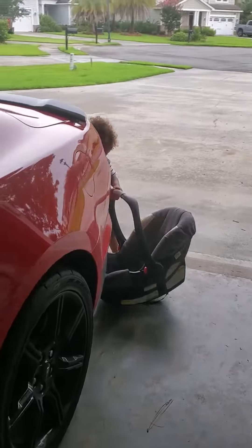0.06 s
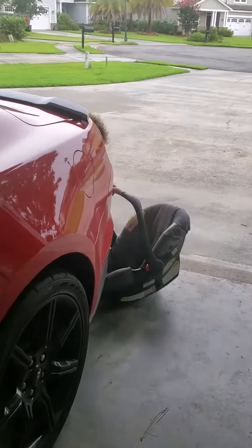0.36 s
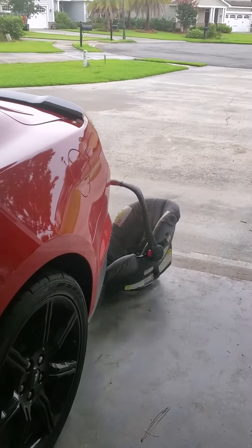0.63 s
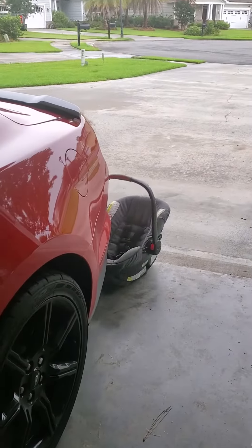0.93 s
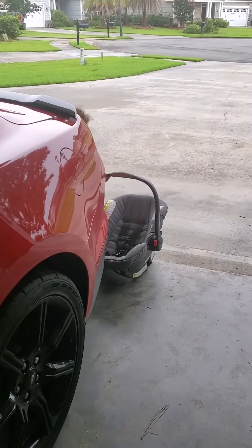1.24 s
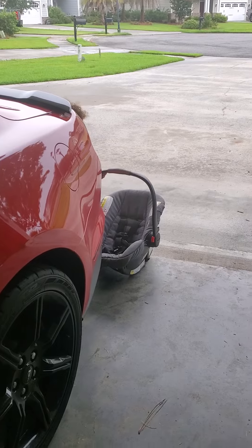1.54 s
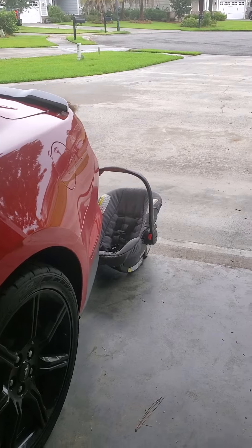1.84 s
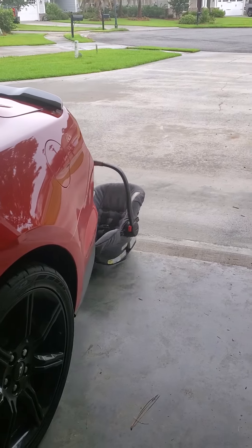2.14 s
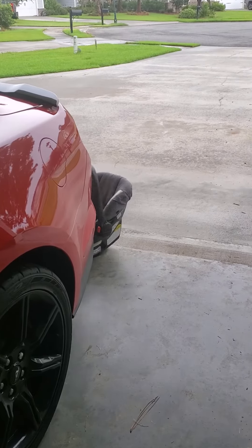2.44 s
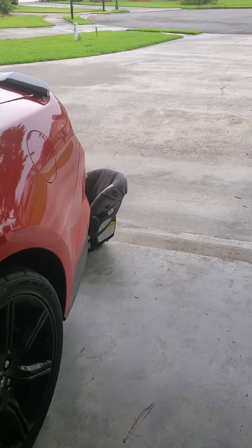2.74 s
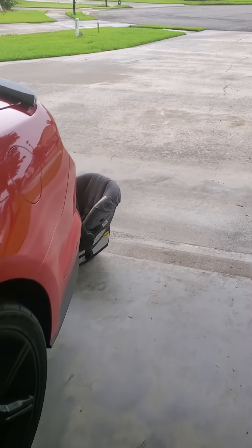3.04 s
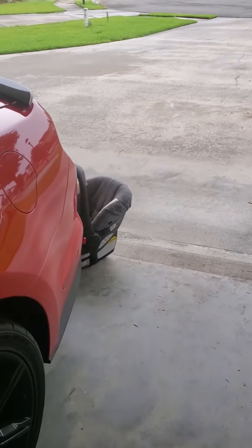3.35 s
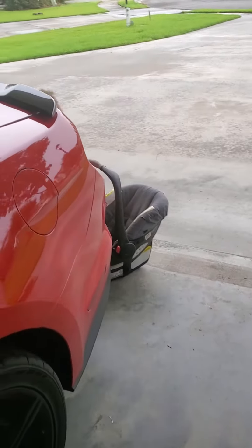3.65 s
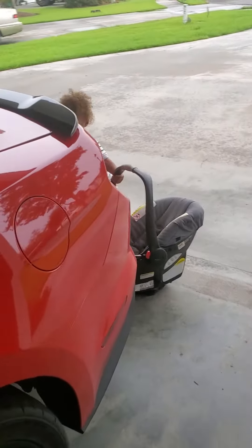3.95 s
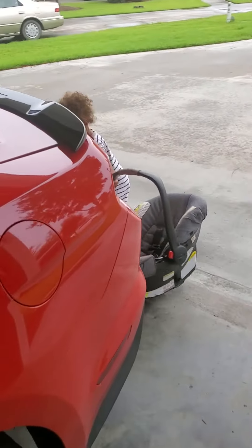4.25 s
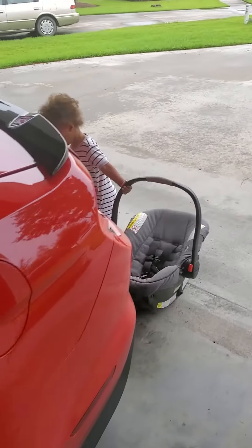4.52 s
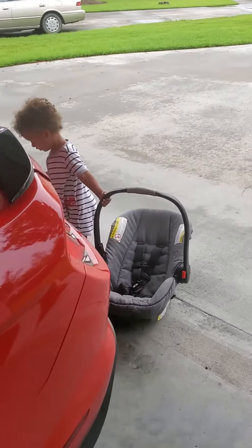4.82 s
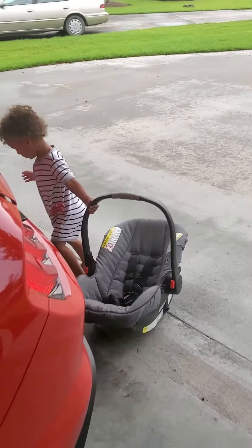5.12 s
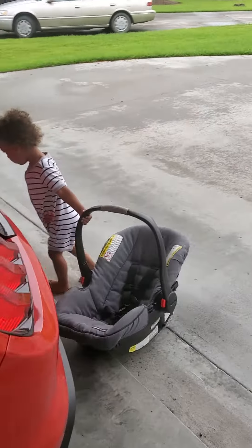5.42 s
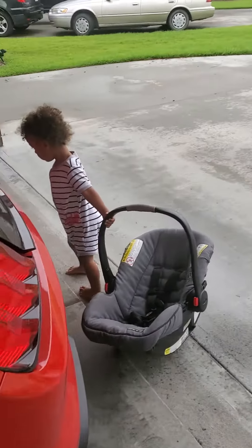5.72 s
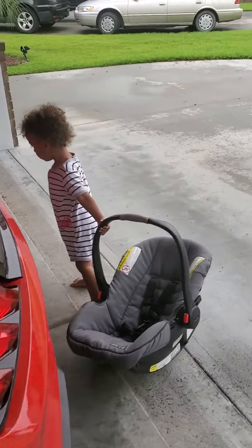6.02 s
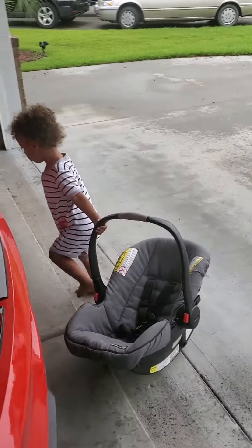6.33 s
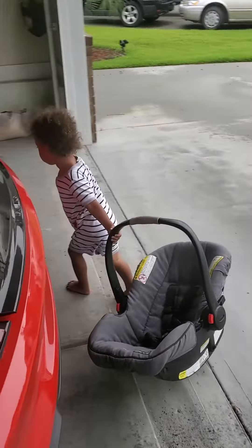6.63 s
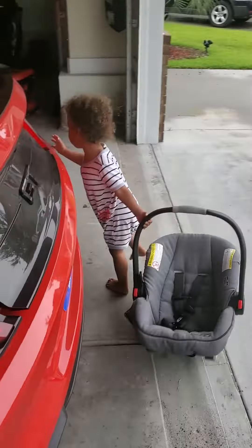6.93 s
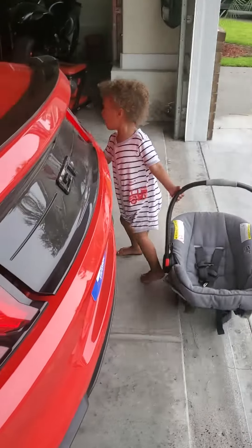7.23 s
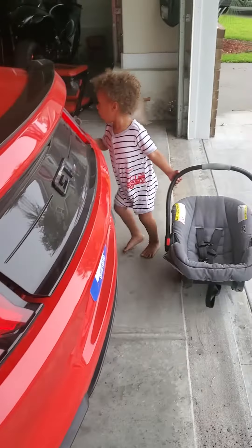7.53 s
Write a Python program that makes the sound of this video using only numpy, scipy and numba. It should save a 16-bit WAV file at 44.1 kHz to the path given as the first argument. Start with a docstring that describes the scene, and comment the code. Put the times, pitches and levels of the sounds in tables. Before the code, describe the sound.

At the mouth of a garage, a plastic infant car seat is dragged over gritty concrete in short uneven pulls. It rasps, hisses and briefly squawks, pauses with a few dull bumps, then lands with a hollow knock. After lighter scrapes and another sharp knock, the dragging grows more continuous, with rumbling and clattering. The garage adds a short echo, and a nearby phone microphone catches faint outdoor rumble and insects.

```python
"""At the mouth of a garage, a toddler drags a plastic infant seat over concrete in short uneven pulls.
Stick-slip friction on grit makes the base rasp, hiss and squeak; impacts at the floor joints excite
the damped modes of the hollow shell, which rumbles and knocks. The garage reverberates briefly.
Dull bumps sound close by; outdoor rumble and faint insects lie behind. A phone's two ports hear it."""
import sys
import numpy as np
from scipy import signal
from scipy.fft import rfft, irfft, next_fast_len
from scipy.io import wavfile
from scipy.ndimage import uniform_filter1d
from numba import njit

SR = 44100
rng = np.random.default_rng(int(sys.argv[2]) if len(sys.argv) > 2 else 0)


def to_wav(sig):
    """Store sig (one row per channel, or 1-D mono) as 16-bit WAV at the path in sys.argv[1].

    Samples outside -1..1 are clipped; the rate is SR.
    """
    pcm = np.clip(np.atleast_2d(sig), -1, 1) * 32767
    pcm = np.round(pcm).astype(np.int16)
    wavfile.write(sys.argv[1], SR, pcm.T)  # frames by channels


N = 342657
TIME = np.arange(N) / SR
PORT_SPACING_M, SOUND_SPEED_M_S = .145, 343

# Levels are relative within each layer.
# pulls: t/s, rise/s, length/s, rasp/dB, rumble/dB, hiss/dB, squawk f/Hz, squawk/dB
SEAT_PULLS = [ (.1, 0.068, 0.18, -43.5, -50, -45.5, 3200, -76),
              (.256, 0.013, 0.059, -28.5, -32, -28, 3220, -28.5),
              (.61, 0.038, 0.12, -28, -35, -35, 1530, -30),
              (.765, 0.0098, 0.066, -34.5, -43, -38.5, 1370, -30.5),
              (.88, .02, 0.19, -50.5, -50, -54, 1300, -56), (1.1, 0.023, 0.11, -76, -34.5, -73, 1320, -76),
              (2.04, 0.049, 0.069, -35.5, -45, -40.5, 2140, -34.5),
              (2.15, 0.1, 0.11, -41, -50, -37, 2140, -42), (2.52, 0.016, 0.028, -33, -32, -45, 1600, -34),
              (2.79, 0.041, 0.055, -40, -47.5, -39.5, 1640, -35),
              (2.86, 0.0137, 0.092, -40, -60.5, -40, 3700, -38),
              (3.05, 0.011, 0.077, -45.5, -51, -42, 3000, -48),
              (3.6, 0.044, 0.078, -44, -42, -48.5, 2100, -55),
              (3.89, 0.048, 0.067, -53, -52, -46.5, 2000, -66),
              (4.03, 0.051, 0.35, -54, -36.5, -52.5, 1400, -41.5),
              (4.22, 0.0049, 0.062, -36, -27.5, -39, 1400, -29.5),
              (4.31, 0.0036, 0.028, -31, -34, -36.5, 1400, -36),
              (4.51, 0.007, 0.2, -42, -26.5, -43, 1700, -47),
              (4.72, 0.022, 0.13, -45.5, -41.5, -55, 1680, -63.5),
              (4.91, 0.0092, 0.17, -60, -54, -50.5, 2280, -54),
              (5.12, 0.038, 0.11, -40.5, -34, -47.5, 2000, -59),
              (5.34, 0.082, 0.22, -54, -33.5, -55, 1770, -50.5),
              (5.48, 0.014, 0.11, -39, -33, -47, 1970, -42.5),
              (5.62, 0.057, 0.046, -60, -41, -26.5, 2440, -30.5),
              (5.89, 0.049, 0.16, -34.5, -26, -42.5, 1870, -48),
              (6.125, 0.0033, 0.014, -38, -25.5, -44, 2000, -47),
              (6.35, 0.032, 0.0637, -52, -31, -35.5, 2463, -30),
              (6.62, 0.0092, 0.062, -36, -27, -44, 2140, -34.5),
              (6.71, 0.023, 0.075, -38, -27.5, -39.5, 2520, -46.5),
              (6.775, .006, 0.077, -40, -31.5, -43, 2580, -51),
              (6.885, 0.0042, 0.2, -34, -22.5, -38, 1460, -52),
              (7.08, 0.036, 0.23, -35, -26.5, -38, 1820, -49),
              (7.33, 0.058, 0.26, -45, -27.5, -49, 2130, -50),
              (7.58, 0.15, 0.24, -48, -39.5, -49.5, 2160, -49.5), ]
# slow sliding between pulls: start t/s, end t/s, level/dB
SEAT_CREEPS = [(0, 0.69, 0.5), (1.95, 2.48, 0.5), (3.1, 3.48, -11.5), (3.3, 3, -31), (3.56, 3.89, -6),
               (3.88, 8.5, -2)]
# drops of the shell on the floor: t/s, blow/dB, favoured f/Hz, crack/dB, rattle time constant/s
IMPACTS = [(2.253, -0.5, 230, -14.5, 0.01), (2.272, -27, 199, -18, 0.0065), (2.526, -17, 298, -39, 0.0058),
           (2.549, -25, 380, -33, 0.0085), (2.687, -10, 267, -31.5, 0.048), (2.835, -25, 432, -32.5, 0.012),
           (4.448, -3.5, 250.7, -7.5, 0.0072), (4.452, 0, 248, -5.5, 0.0042),
           (4.466, -5.5, 332, -20.5, 0.0067), (4.491, -12.5, 258, -20.5, 0.0023),
           (4.542, -18, 420, -24, 0.0091), (4.589, -16, 510, -29, 0.0091), (5.279, -20, 313, -37, 0.015),
           (5.951, -29, 280, -29, 0.018), (6.036, -8, 290, -20.5, 0.0051), (6.676, -11, 270, -26.5, 0.0096),
           (6.741, -13, 290, -41, .015), (6.883, -4, 300, -14.5, 0.0063), (6.961, -16, 330, -21, 0.018),
           (7.002, -12.5, 310, -27.5, 0.012), (7.107, -6.5, 300, -21.5, 0.0065),
           (7.319, -11, 324, -26.5, 0.013), (7.5, -21, 260, -49, 0.018), (7.723, -24, 286, -44, 0.0127)]
# an edge crushes or skids over grit: t/s, level/dB, length/s, centre f/Hz
GRIT_SKIDS = [(0.256, -24.5, 0.045, 7100), (0.777, -32, 0.021, 3140), (2.072, -41, 0.024, 2500),
              (2.159, -35, 0.0081, 3960), (2.275, -26.5, 0.0052, 2980), (2.827, -36.5, 0.0073, 9300),
              (4.225, -38, .002, 9000), (4.318, -35, 0.008, 8000), (4.443, -40, 0.0018, 7000),
              (4.539, -41, 0.0064, 9000), (4.613, -36, 0.0035, 10000), (4.908, -38.5, 0.015, 3000),
              (5.014, -43, 0.004, 9300), (5.494, -40.5, 0.0078, 2200), (5.547, -36, 0.0018, 5000),
              (5.609, -26, 0.0029, 3930), (5.649, -36, 0.02, 4400), (5.929, -36.5, 0.0036, 5030),
              (6.323, -41, 0.0077, 9800), (6.374, -45, 0.018, 2900), (6.767, -28.5, 0.0058, 3400),
              (6.894, -29, 0.003, 8200), (6.953, -28.5, 0.0028, 9000), (6.971, -22.5, 0.0202, 9200),
              (7.43, -38, 0.0094, 2640)]
# squeaks of a plastic edge: t/s, length/s, start f/Hz, end f/Hz, level/dB
SQUEAKS = [(6.636, .018, 2380, 2000, -44), (6.774, 0.00853, 2710, 3840, -33),
           (6.974, 0.0063, 4180, 9000, -31)]
# dull bumps: t/s, level/dB, f/Hz
SOFT_BUMPS = [(1.03, -23.5, 85.2), (1.085, -24, 103), (1.131, -11, 100), (1.178, -20.5, 147.6),
              (1.462, -22, 96.5), (1.628, -21, 94.5), (1.852, -19.5, 79.6), (2.243, -17, 99),
              (3.026, -26, 117), (4.447, -16.5, 112.3)]
# modes of the hollow shell: f/Hz, level/dB, T60/s
SHELL_MODES = [(158, -28.5, 0.11), (201, -10, 0.13), (241, 2, 0.0323), (280, -14, 0.079), (322, 3, 0.037),
               (377.5, 2.5, 0.024), (457.4, -4.5, 0.1), (544, -4, 0.032), (673, -3.5, 0.043),
               (793, -6, 0.03), (915, -11.5, 0.046), (1080, -18.5, 0.025)]
# resonances of the ribs of the base: f/Hz, bandwidth/Hz, gain/dB
RIB_RESONANCES = [(730, 187, 2.5), (950, 24, 3), (1400, 210, 0), (3110, 260, 1.5), (3700, 990, 1),
                  (9200, 1800, 3.5)]
# spectra of rasping grit, hissing sand and the crack at the rim: f/Hz, level/dB
RASP_SPECTRUM = [(100, -35), (400, 6), (800, 0), (1400, 0.5), (2200, -2.5), (3500, -4), (4600, -6),
                 (6500, -44), (16000, -60)]
SAND_SPECTRUM = [(500, -46), (2500, -12), (4500, 1), (6000, -0.5), (9000, 0), (11000, 1), (15000, 2),
                 (18000, -32)]
CRACK_SPECTRUM = [(25, -66), (85, -6.5), (160, -8), (300, 8.5), (500, -1.5), (1000, 3.5), (1650, -2),
                  (2700, -10.5), (5000, -17.5), (9000, -26), (16000, -19)]
# spectrum of a skid: f/centre f, level/dB
SKID_SPECTRUM = [(.15, -2.5), (.45, -6), (.75, 0.5), (1.15, 0), (1.9, -8), (6, -14.5)]
# positions of the seat: start t/s, bearing to the left/degrees, direct sound/dB
SEAT_POSITIONS = [(0, 13, -13.5), (.55, 37, -8), (1.9, 6, -12.5), (2.45, 13.5, -12), (3.5, 35.5, -9.5),
                  (4.4, 51, -5.5), (4.851, 55, -7.5), (6.28, 20.5, -11.5), (6.76, -9.5, -7)]
# reverberation time of the garage: f/Hz, T60/s
GARAGE_T60 = [(150, 0.13), (400, 0.54), (1000, 0.53), (2800, 0.53), (7000, 0.48), (15000, 0.31)]
# spectrum of the outdoor rumble: f/Hz, level/dB
OUTDOOR_SPECTRUM = [(20, -57), (30, -12.5), (45, -4), (60, 0.5), (82, 1), (130, -8), (250, -10.5),
                    (400, -19.5), (800, -26.5), (1300, -39), (2500, -57.5), (5000, -58.5), (16000, -66.5)]
# course of the outdoor rumble: t/s, level/dB
OUTDOOR_LEVEL = [(0.0, -46.5), (1.67, -37.5), (1.92, -39.5), (2.27, -37.5), (2.51, -43.5), (4.57, -42),
                 (7.1, -37.5), (7.25, -40.5), (7.77, -33)]
# calls of insects and birds: t/s, length/s, f/Hz, half-width/Hz, level/dB
GARDEN_CALLS = [(1.285, 0.21, 6520, 110, -68), (1.302, 0.3, 2070, 220, -70), (1.628, 0.24, 6520, 110, -69),
                (2.5, 0.14, 6500, 110, -65), (3.542, 0.12, 6520, 110, -70)]
# difference in response between the ports: f/Hz, left minus right/dB
PORT_DIFFERENCE = [(250, 0.5), (1300, 0.5), (2300, -2.5), (4200, 1.3), (8000, 0.5), (12500, 0)]


def runner(gains, squawk_hz):
    """Stick-slip friction: one runner of the base catches on grit, exciting the ribs and the shell."""
    judder = unit(undb(1.125 * walk(per_s=61) + 2 * walk(per_s=25)))
    pebbles = undb(-6.5) * grains(per_s=30, spread_db=0.5)  # lone ticks among the dense grit
    grit = grains(per_s=1600, spread_db=3.5) * judder + pebbles
    rasp = colour(grit, RASP_SPECTRUM, RIB_RESONANCES)
    wavering_hz = squawk_hz * np.exp(0.0884 * walk(per_s=19))
    squawk = unit(resonate(rasp, wavering_hz, damping=0.33))
    shaking = grains(per_s=700, spread_db=0.5) * np.sqrt(judder)
    rumble = unit(ring(shaking, shell_response(favoured_hz=384, focus_db=4)))
    sand = grains(per_s=1300, spread_db=3.5) * judder + pebbles
    hiss = colour(sand, SAND_SPECTRUM, RIB_RESONANCES)
    return undb([-6, -6, -3, -6]) @ (gains * [rasp, rumble, hiss, squawk])


def drag():
    """Friction noise follows the motion: gains of rasp, rumble, hiss and squawk, and the squawk's f/Hz."""
    creep = sum(undb(db) * stroke(start, rise=0.031, length=end - start, sag_db=-0.5)
                for start, end, db in SEAT_CREEPS)
    gains = np.zeros((4, N))
    gains[:3] = np.outer(undb([-49.5, -46, -56]), creep)  # creeping does not squawk
    squawk_hz = np.full(N, float(SEAT_PULLS[0][6]))
    for start, rise, length, rasp_db, rumble_db, hiss_db, hz, squawk_db in SEAT_PULLS:
        here = slice(int(start * SR), int(start * SR) + SR)
        envelope = stroke(start, rise, length, sag_db=2.5)[here]
        pull = np.outer(undb([rasp_db, rumble_db, hiss_db, squawk_db]), envelope)
        gains[:, here] = np.maximum(gains[:, here], pull)
        squawk_hz[here] = hz
    return gains, squawk_hz


def stroke(start, rise, length, sag_db, coast_s=0.023):
    """Envelope of one slide: linear rise, drift in level, exponential decay as the seat coasts."""
    t = TIME - start
    sag = undb(-sag_db * np.clip(t / length, 0, 1))
    return np.clip(t / rise, 0, 1) * sag * np.exp(-np.maximum(t - length, 0) / coast_s)


def shell_response(favoured_hz, focus_db, detune=0.067, tones_per_mode=4):
    """Modal superposition: clusters of damped tones, focus_db weaker per octave from the favoured pitch."""
    t = TIME[:SR // 3]
    modes = SHELL_MODES * tones_per_mode
    out = 0
    for (hz, db, t60), (scatter_db, offset) in zip(modes, rng.standard_normal((len(modes), 2))):
        gain = undb(db + scatter_db - focus_db * abs(np.log2(hz / favoured_hz)))
        tone = np.sin(2 * np.pi * hz * (1 + detune * offset) * t)
        out = out + gain * tone * undb(-60 * t / t60)
    return out


def knocks():
    """Impact excitation: each drop booms in the shell and cracks at the rim, where loose parts chatter."""
    out = np.zeros(N)
    t = TIME[:SR // 3]
    give = 1 - np.exp(-t / 0.000934)  # the plastic yields before it rings
    for start, blow_db, hz, crack_db, rattle_s in IMPACTS:
        boom = shell_response(hz, focus_db=7) * give
        chatter = rng.standard_normal(len(t)) * give * np.exp(-t / rattle_s)
        crack = colour(chatter, CRACK_SPECTRUM, RIB_RESONANCES)
        add(out, start, undb(blow_db) * boom / np.abs(boom).max() + undb(crack_db) * crack)
    return out


def jolts(contact_s=0.0021, gain_db=-9):
    """Forced motion: on landing, the seat's weight drives the whole base through a cycle or two."""
    out = np.zeros(N)
    t = TIME[:SR // 20]
    pulse = t / contact_s * np.exp(1 - t / contact_s)
    for start, blow_db, hz, _, _ in IMPACTS:
        add(out, start, -undb(blow_db + gain_db) * pulse * np.sin(2 * np.pi * hz * t))
    return out


def skids(attack_s=0.00068, release_s=0.0012, catch_db=5, catch_s=0.0025):
    """Brittle fracture: crushed grit gives bright bursts, strongest as the edge breaks loose."""
    out = np.zeros(N)
    grit = grains(per_s=6000, spread_db=4.5)
    t = TIME[:SR // 4]
    catch = np.minimum(t / attack_s, 1) * undb(catch_db * np.exp(-t / catch_s))
    for start, db, length, hz in GRIT_SKIDS:
        release = np.exp(-np.maximum(t - length, 0) / release_s)
        burst = catch * release * grit[int(start * SR):][:len(t)]
        spectrum = [(ratio * hz, level) for ratio, level in SKID_SPECTRUM]
        add(out, start, undb(db) * colour(burst, spectrum, RIB_RESONANCES))
    return out


def squeaks(wobble=.02, octave_db=-15):
    """Stick-slip oscillation of a plastic edge: a brief unsteady glide with its second harmonic."""
    out = np.zeros(N)
    unsteady = 1 + wobble * walk(per_s=400)
    for start, length, from_hz, to_hz, db in SQUEAKS:
        along = np.linspace(0, 1, int(length * SR))
        hz = (from_hz + (to_hz - from_hz) * along) * unsteady[int(start * SR):][:len(along)]
        phase = 2 * np.pi * np.cumsum(hz) / SR
        arch = 2 * np.sqrt(along * (1 - along))
        add(out, start, undb(db) * arch * (np.sin(phase) + undb(octave_db) * np.sin(2 * phase)))
    return out


def bumps():
    """Heavily damped vibration: padded thuds of a few cycles, each with a muffled scuff."""
    out = np.zeros(N)
    t = TIME[:SR // 4]
    swell = t / 0.0248 * np.exp(1 - t / 0.012)
    for start, db, hz in SOFT_BUMPS:
        noise = rng.standard_normal(len(t))
        scuff = colour(noise, [(60, -3), (150, 16.5), (420, 5), (900, -59), (2500, -97.5)])
        add(out, start, undb(db) * swell * (np.sin(2 * np.pi * hz * t) + 0.3 * scuff))
    return out


def garage(sound, facing_db):
    """Room convolution: each position has its own echoes; facing_db weights the direct path alone."""
    position = np.searchsorted(np.array(SEAT_POSITIONS)[1:, 0], TIME)
    out = np.zeros((2, N))
    for k, (_, bearing, direct_db) in enumerate(SEAT_POSITIONS):
        crossfade = uniform_filter1d((position == k) * 1., size=512)
        here = np.flatnonzero(crossfade > 1e-6)
        for port, response in zip(out, garage_response(bearing, direct_db + facing_db)):
            add(port, TIME[here[0]], signal.fftconvolve(sound[here] * crossfade[here], response))
    return out


def garage_response(bearing, direct_db, echoes_db=-6, early_s=0.0099, bands=8):
    """Impulse response: direct sound, early reflections from floor and car, then reverberation."""
    t = TIME[:SR]
    hz, field = diffuse(SR)
    centres = np.geomspace(120, 15000, bands)
    late = 0
    for centre, weights in zip(centres, np.eye(bands)):
        band = irfft(field * on_log_axis(hz, np.c_[centres, weights]))
        late = late + band * undb(-60 * t / on_log_axis(centre, GARAGE_T60))
    late *= 1 - np.exp(-t / 0.0019)
    early = irfft(diffuse(SR)[1]) * np.exp(-t / early_s) * (1 - np.exp(-t / 0.0013))
    response = undb(echoes_db) * (unit(late) + unit(early)) / np.sqrt(SR)
    lag = int(PORT_SPACING_M * np.sin(np.radians(bearing)) / SOUND_SPEED_M_S * SR)
    response[[0, 1], [max(-lag, 0), max(lag, 0)]] += undb(direct_db)  # the far port hears it later
    return response


def outdoors(gust_db=1.5, gain_db=2):
    """Diffuse low-frequency noise of open air and far traffic, modulated by quick gusts."""
    size = next_fast_len(N)
    noise = irfft(diffuse(size)[1], size)[:, :N]
    air = np.array([colour(port, OUTDOOR_SPECTRUM) for port in noise])
    level_db = np.interp(TIME, *np.transpose(OUTDOOR_LEVEL)) + gust_db * walk(per_s=12)
    return unit(air) * undb(level_db + gain_db)


def insects():
    """Narrow-band noise: a faint steady chorus, with short calls of insects and birds over it."""
    out = undb(-73) * buzz(hz=9100, half_width_hz=380, size=N)
    out += undb(-80) * buzz(hz=6560, half_width_hz=130, size=N)
    t = TIME[:SR // 2]
    for start, length, hz, half_width_hz, db in GARDEN_CALLS:
        arch = np.sqrt(np.maximum(1 - (2 * t / length - 1) ** 2, 0))
        for port, call in zip(out, buzz(hz, half_width_hz, len(t))):
            add(port, start, undb(db) * arch * call)
    return out


def buzz(hz, half_width_hz, size):
    """Band-pass filtering of a diffuse field leaves a pitched noise from all sides."""
    padded = next_fast_len(size)
    f, field = diffuse(padded)
    return unit(irfft(field / (1 + ((f - hz) / half_width_hz) ** 4), padded)[:, :size])


def diffuse(size):
    """Diffuse-field coherence: noise spectra at the ports, alike in the bass, unrelated in the treble."""
    hz = np.fft.rfftfreq(size, 1 / SR)
    coherence = np.sinc(2 * hz * PORT_SPACING_M / SOUND_SPEED_M_S)
    mid, side = rfft(rng.standard_normal((2, size)))
    mid, side = mid * np.sqrt((1 + coherence) / 2), side * np.sqrt((1 - coherence) / 2)
    return hz, np.array([mid + side, mid - side])


def grains(per_s, spread_db):
    """Poisson impulses: random sharp catches, a few much larger than the rest; rms 1."""
    hit = rng.random(N) < per_s / SR
    size = undb(spread_db * np.minimum(rng.exponential(size=N), 5))
    return unit(hit * size * rng.standard_normal(N))


def walk(per_s):
    """Random modulation: straight lines between Gaussian values; rms 1."""
    knots = rng.standard_normal(4096)
    return unit(np.interp(TIME * per_s, np.arange(len(knots)), knots))


@njit
def resonate(x, hz, damping):
    """Second-order resonance with a moving centre frequency; damping is 1/Q."""
    y, band, low = np.empty(len(x)), 0., 0.
    for i in range(len(x)):
        g = np.tan(np.pi * hz[i] / SR)
        v = (band + g * (x[i] - low)) / (1 + g * (g + damping))
        band, low, y[i] = 2 * v - band, low + 2 * g * v, damping * v
    return y


def colour(x, spectrum, peaks=(), size=4096):
    """Minimum-phase filter of unit energy: a smooth spectrum with resonance peaks on it."""
    hz = np.fft.rfftfreq(size, 1 / SR)
    peaks_db = sum(db / (1 + (2 * (hz - f) / width) ** 2) for f, width, db in peaks)
    cepstrum = irfft(np.log(undb(on_log_axis(hz, spectrum) + peaks_db)))
    cepstrum[1:size // 2] *= 2  # folding the cepstrum makes the filter causal
    cepstrum[size // 2 + 1:] = 0
    response = irfft(np.exp(rfft(cepstrum)))
    return ring(x, response / np.linalg.norm(response))


def ring(x, response):
    """Convolution with an impulse response."""
    return signal.oaconvolve(x, response)[:len(x)]


def on_log_axis(hz, points):
    """Interpolation of (f/Hz, value) points over log frequency."""
    f, value = np.transpose(points)
    return np.interp(np.log(hz + 1), np.log(f), value)


def add(out, start_s, sound):
    """Superposition of a sound from start_s on."""
    start = round(start_s * SR)
    out[start:start + len(sound)] += sound[:N - start]


def undb(db):
    """Level to amplitude ratio."""
    return 10 ** (np.asarray(db) / 20)


def unit(x):
    """Normalisation to rms 1."""
    return x / np.sqrt(np.mean(x ** 2))


def scene():
    """Superposition of two runners, the front edge with its stronger direct path, and the background."""
    gains, squawk_hz = drag()
    grit = skids()
    far_side = garage(runner(gains, squawk_hz) + knocks(), facing_db=-1)
    near_side = garage(runner(gains, squawk_hz) + undb(-1.5) * grit, facing_db=-0.3)
    front_edge = garage(jolts() + squeaks() + undb(-14) * grit, facing_db=12)
    return far_side + near_side + front_edge + bumps() + outdoors() + insects()


def record(dry):
    """Transduction: the ports colour each side; the phone cuts deep bass, clips peaks and cuts the top."""
    size = next_fast_len(N)
    balance_db = on_log_axis(np.fft.rfftfreq(size, 1 / SR), PORT_DIFFERENCE)
    heard = irfft(rfft(dry, size) * undb(np.array([balance_db, -balance_db]) / 2), size)[:, :N]
    high_pass = signal.butter(4, 32, "high", fs=SR, output="sos")
    low_pass = signal.ellip(10, .1, 80, 15900, fs=SR, output="sos")
    clipped = np.clip(signal.sosfilt(high_pass, heard), -.93, .93)
    return signal.sosfilt(low_pass, clipped)


dry = scene()
out = record(dry)
to_wav(out)
```